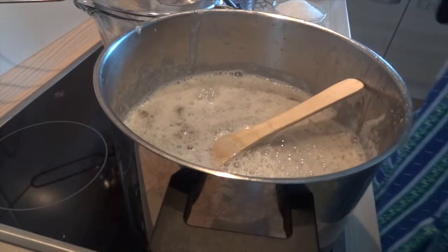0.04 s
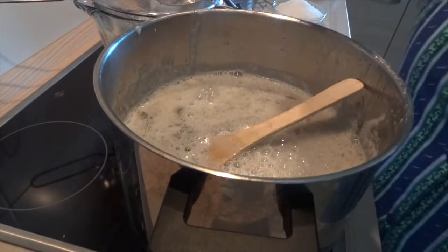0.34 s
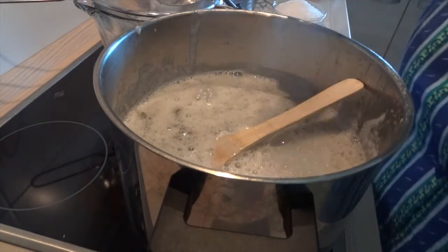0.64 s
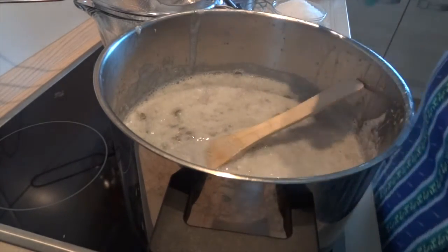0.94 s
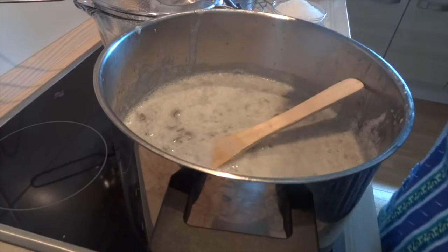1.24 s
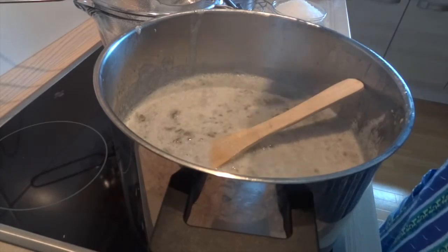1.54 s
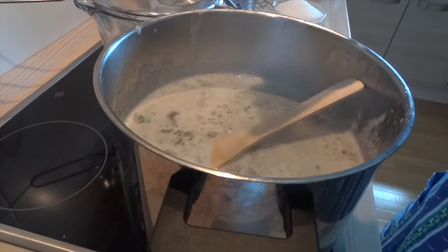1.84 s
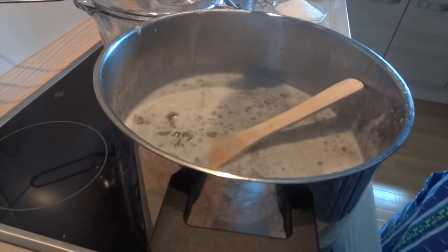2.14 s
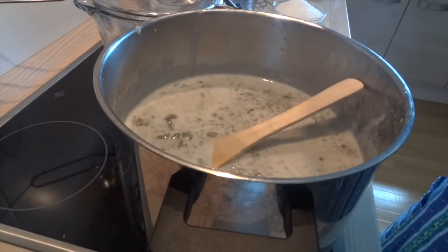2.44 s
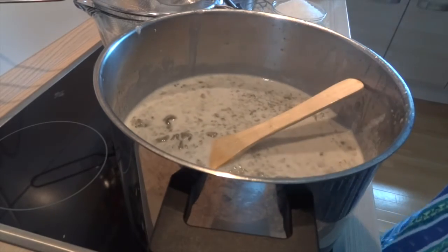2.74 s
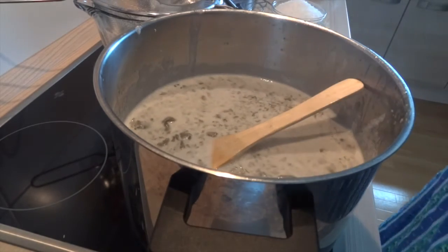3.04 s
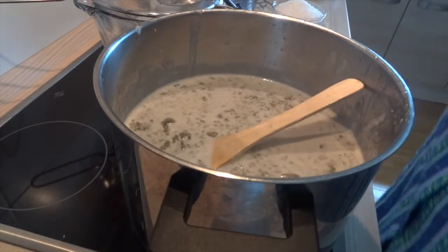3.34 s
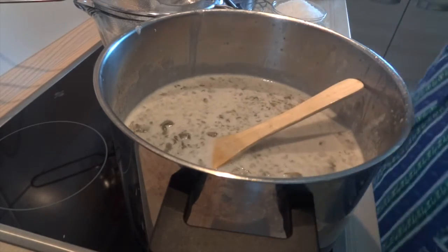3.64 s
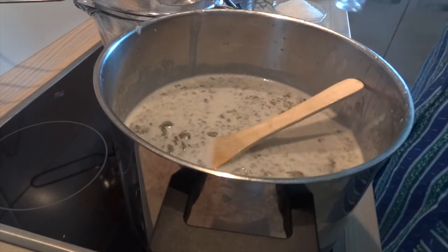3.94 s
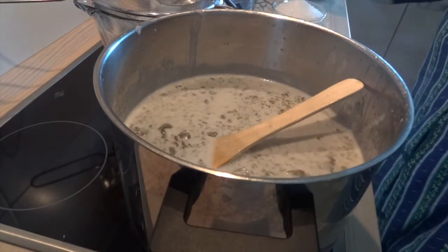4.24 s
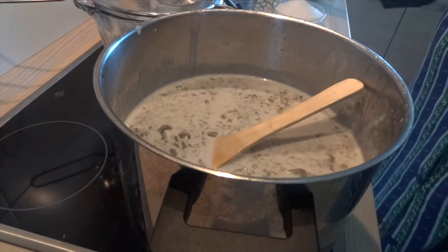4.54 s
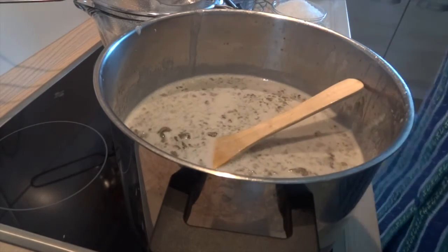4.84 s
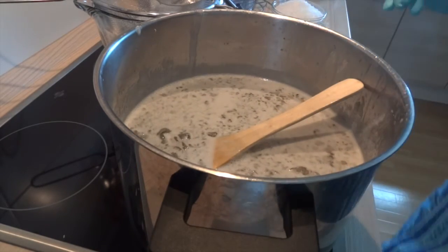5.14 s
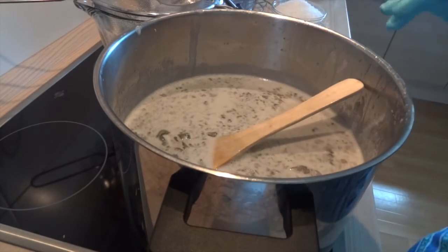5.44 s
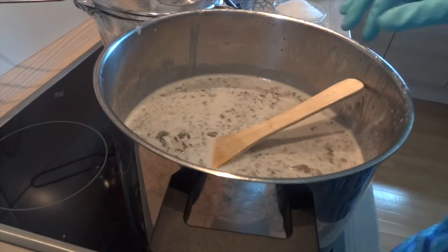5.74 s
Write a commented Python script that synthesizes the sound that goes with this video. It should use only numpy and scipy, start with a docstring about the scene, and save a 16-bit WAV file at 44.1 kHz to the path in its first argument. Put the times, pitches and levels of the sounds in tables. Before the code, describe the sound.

In a small, quiet kitchen, a nearby spray bottle is pumped five times in quick succession, with plastic snaps, spits of air and short hisses over a faint, fading fizz of foam. The bottle is set on the worktop with a few light, hollow taps. Clothes rustle softly, and a wooden door shuts with one sharp bang and a short boom, leaving low room hush.

```python
"""Five quick squirts from a trigger spray bottle hiss over softly fizzing foam in a small kitchen.
The plastic pump snaps, air pockets spit from the nozzle, mist hisses and the trigger clacks back.
The foam sits in a pot and fizzes because its tiny bubbles burst, more faintly as it collapses.
The bottle is put down, clothes rustle, and a wooden door bangs shut, so cupboard and room ring."""
import sys
import numpy as np
from scipy import signal
from scipy.fft import rfft, irfft, next_fast_len
from scipy.io import wavfile
from scipy.ndimage import uniform_filter1d

SR = 44100
rng = np.random.default_rng(int(sys.argv[2]) if len(sys.argv) > 2 else 0)


def wav_out(sig):
    """Save sig, one row per channel (or a flat mono array), as 16-bit PCM at SR to the path in sys.argv[1]."""
    wavfile.write(sys.argv[1], SR, np.round(np.clip(np.atleast_2d(sig).T, -1, 1) * 32767).astype(np.int16))


N = 264104
TIME = np.arange(N) / SR
RING = TIME[:SR]  # a one-second clock for short sounds

# A tone table says how strong each frequency is. A fade_s is the time to die away by 60 dB.
# tone of the room's hush: frequency_hz, level_db
HUSH_TONE = [(15, -25), (25, -25), (108, -1), (206, -5.5), (591, -8), (988, -13), (1130, -9), (1370, -12),
             (1790, -12), (3430, -15), (11900, -20.5), (14800, -21), (16000, -27)]
# how long the room echoes: frequency_hz, fade_s
ROOM_FADE = [(150, 0.45), (1000, 0.36), (4000, 0.33), (9000, 0.38), (16000, 0.1)]
# tone of the room's echo: frequency_hz, level_db
ROOM_ECHO_TONE = [(200, 7.5), (1200, 4), (3000, -1.5), (5000, -1), (16000, -1.5)]
# echoes off the pot and worktop: delay_s, gain
CLOSE_ECHOES = [(.003, 0.24), (.0058, 0.13), (.0069, 0.14)]
# how much hush and echo differ between left and right: frequency_hz, level_db
STEREO_WIDTH = [(60, -12), (110, -11.5), (200, 0), (400, 4.5), (1300, 2.5), (2400, -2.5), (4400, -13),
                (8000, -44.5), (16000, -42)]
# how far the left side is ahead of the right: frequency_hz, phase_radians
LEFT_LEAD = [(40, 0), (120, .15), (400, 0.32), (750, 0.6), (1200, 0.3), (2400, 0.3), (4400, 0), (16000, 0)]
# tone of bursting bubbles: frequency_hz, level_db
FIZZ_TONE = [(300, 2), (1000, -2.5), (2100, 2), (5000, -0.5), (10000, -4), (16000, -5.5)]
# clothes and gloves rubbing: start_s, length_s, level_db, centre_hz
CLOTH_RUSTLES = [(.15, .32, -50, 2060), (2.642, 0.12, -51.5, 4670), (3.689, 0.16, -50.5, 3100),
                 (3.94, .12, -49, 4460), (4.143, 0.061, -49.5, 4000), (4.819, 0.075, -55.5, 2520),
                 (5.194, 0.07, -49.5, 2920), (5.66, 0.34, -58.5, 655), (5.933, .08, -51, 1600)]
# small handling ticks and the door latch's click: start_s, level_db, centre_hz, width_octaves, decay_s
SMALL_TICKS = [(.066, -39, 2700, .25, 0.0091), (0.51, -30.5, 3880, 0.72, .008),
               (2.5636, -28.5, 4940, 1.35, 0.0025), (2.6005, -37, 3970, 0.094, 0.0024),
               (2.6675, -29, 4760, 0.24, 0.0044), (2.839, -43.5, 2850, 0.12, 0.0016),
               (2.8534, -39, 5900, 0.31, 0.0015), (2.896, -38.5, 7000, 0.46, .0034),
               (2.938, -42, 4150, 0.51, .012), (3.769, -42, 2530, 0.32, 0.0032),
               (4.1366, -39, 1570, 1, 0.022), (4.513, -38, 6460, .4, 0.0028),
               (5.548, -44.5, 6000, 1.6, 0.0064)]
# thin, lingering rings: start_s, level_db, pitch_hz, decay_s
THIN_PINGS = [(2.014, -37, 1200, 0.043), (5.799, -46, 14300, .025)]
# the bottle rocking on the worktop: start_s, level_db, centre_hz, width_octaves, decay_s, ring_db
BOTTLE_TAPS = [(3.0282, -33.5, 2600, 0.56, .003, -7), (3.164, -38, 2050, 1.1, 0.003, -13),
               (3.3113, -23, 2480, 0.62, 0.01, -13), (3.3453, -20, 1850, 0.45, 0.0014, -14),
               (3.38, -31, 2930, 0.54, .0086, -20), (3.484, -31, 1540, 0.43, 0.005, -18)]
# notes the bottle rings with: pitch_hz, level_db, fade_s
BOTTLE_NOTES = [(1810, -2, 0.1), (2850, -2, .22), (2980, 6, 0.17), (5500, -7, 0.3), (5680, -1, 0.17)]
# tone of the hollow cupboard: frequency_hz, level_db
CUPBOARD_TONE = [(35, -71), (60, -14.5), (156, -6), (198, -9.5), (233, -25), (268, -8), (398, -6.5),
                 (480, -14), (527, -16), (991, -9.5), (1250, -11.5), (5330, -20), (16000, -43.5)]
# how long the cupboard booms: frequency_hz, fade_s
CUPBOARD_FADE = [(100, 0.69), (400, 0.5), (1500, 0.51), (5000, 0.44), (14000, 0.56)]
# the door rattling against its frame: start_s, level_db, centre_hz, width_octaves
DOOR_BLOWS = [(4.349, -16.5, 1920, 1.1), (4.356, -20.5, 785, 0.97), (4.369, -24, 1500, 1.2),
              (4.3796, -19, 580, 0.21), (4.413, -25, 1180, 0.19)]
# notes the cupboard and room ring with after the bang: pitch_hz, level_db, fade_s
CUPBOARD_ROOM_NOTES = [(79.7, -9, 0.42), (153.6, 3.5, 0.27), (237.5, -1, 0.35), (392.5, -6.5, 0.49),
                       (401.4, 4.5, 0.32), (434.5, 0, 0.32), (456, -6, 0.31), (516, -3, 0.44),
                       (546, 0.5, 0.37), (570, -14, 0.56), (616, -6.5, 0.37), (617, 1.5, 0.35),
                       (683, -9, 0.44), (716, -8, 0.33), (764, -6, 0.35), (810, -4, 0.33), (808, -5, 0.33),
                       (840, -7.5, 0.39), (925, -8, 0.34), (1040, -16, 0.39), (1180, -7.5, 0.44),
                       (1268, -8.5, 0.44), (1291, -7, 0.38), (1435, -11.5, 0.42), (1590, -4, 0.2),
                       (1875, -22, 0.39), (1860, -15, 0.45), (2005, -13, 0.3), (2105, -10, 0.37)]
# the pump sipping fresh liquid: start_s, level_db
PUMP_SIPS = [(0.939, -28.5), (2.013, -27), (2.376, -29)]
# sharp snaps of the plastic pump: start_s, level_db, decay_s
PUMP_SNAPS = [(1.1491, -32, 0.0044), (1.4743, -20.5, 0.0043), (1.5309, -16.5, 0.008), (1.8086, -16, 0.0057)]
# tone of a snap: frequency_hz, level_db
SNAP_TONE = [(240, -66), (400, -24.5), (1490, -9), (1840, -13), (2290, -6), (2590, -7), (3260, 0),
             (4110, -11.5), (5190, -6), (7990, -8), (15000, -19), (16000, -15.5)]
# the trigger springing back to its stop: start_s, level_db, decay_s
TRIGGER_CLACKS = [(0.9304, -20, 0.0038), (1.4186, -22, .0015), (1.718, -21, 0.0025), (1.997, -21.5, 0.0046),
                  (2.346, -18.5, 0.0052)]
# tone of a clack: frequency_hz, level_db
CLACK_TONE = [(180, -34), (300, -14.5), (1260, 4), (1540, 5.5), (2070, -10.5), (2990, 7), (3280, 3),
              (3890, -14), (5130, -15), (6180, -31), (7320, -14), (7910, -32), (9230, -26), (11100, -33),
              (12000, -32), (15600, -62), (22000, -120)]
# the mist from each pull of the trigger: start_s, level_db
SQUIRTS = [(0.67, -37), (1.207, -32), (1.551, -31), (1.823, -31.5), (2.171, -31)]
# tone of the mist: frequency_hz, level_db
MIST_TONE = [(150, -65), (250, -15.5), (452, -37.5), (723, -12), (1020, -12.5), (1420, -5), (1640, -9.5),
             (1950, -4), (2440, -4), (2910, 1), (5440, -2), (13400, 0.5), (16000, -6.5)]
# air pockets bursting from the nozzle: start_s, level_db, decay_s
AIR_SPITS = [(0.671, -19.5, 0.0049), (0.717, -29, 0.005), (0.7318, -19.5, 0.0062), (.749, -23.5, .008),
             (.7725, -26, 0.0021), (0.7965, -21.5, 0.0098), (0.8414, -33, 0.0018), (1.1997, -28, 0.0037),
             (1.2104, -26.5, .0015), (1.563, -26, .005), (1.8476, -25.5, 0.0026), (1.864, -20, 0.0066),
             (2.1781, -24.5, .005)]
# tone of a spit: frequency_hz, level_db
SPIT_TONE = [(100, -16), (400, -3.5), (900, 0), (2000, -3.5), (5000, -5), (9000, 1), (12000, 7),
             (14500, 7.5), (16000, -12)]
DOOR_SHUT_S = DOOR_BLOWS[0][0]


def amp(db):
    """Turns decibels into a gain to multiply by."""
    return 10 ** (np.asarray(db) / 20)


def unit(x):
    """Scales a sound to an average (rms) level of 1."""
    return x / np.sqrt(np.mean(x ** 2) + 1e-20)


def packet(x):
    """Gives a short sound the energy of 5 ms at level 1."""
    return x * np.sqrt(.005 * SR / (np.sum(x ** 2) + 1e-20))


def read(points, hz):
    """Looks up a frequency in a table, gliding between rows on a log scale."""
    f, value = np.transpose(points)
    return np.interp(np.log(hz + 1), np.log(f + 1), value)


def add(mix, s, sound):
    """Mixes a sound in, starting at s seconds."""
    part = mix[round(s * SR):][:len(sound)]
    part += sound[:len(part)]


def colour(x, tone, size=4096):
    """Filters a sound to follow a tone table."""
    log_gain = np.log(amp(read(tone, abs(np.fft.fftfreq(size, 1 / SR)))))
    response = np.exp(np.conj(signal.hilbert(log_gain)))  # rings after a hit, never before
    taps = np.fft.ifft(response).real[:size // 2]
    return signal.oaconvolve(x, taps)[:len(x)]


def hump(hz, octaves):
    """A tone table with one peak at hz."""
    f = np.geomspace(30, SR / 2, 400)
    return np.transpose([f, -20 * np.log10(1 + (np.log2(f / hz) / octaves) ** 2 / 2) * 1.185])


def contact(decay_s, crack):
    """Two things touch: a sharp crack, then dying chatter."""
    chatter = packet(rng.standard_normal(SR) * np.exp(-np.minimum(RING / decay_s, 20)))
    return chatter + crack * packet(1. * (RING == 0))


def click(db, tone, decay_s, crack):
    """One contact, with the tone of the thing it strikes."""
    return amp(db) * packet(colour(contact(decay_s, crack), tone))


def grains(per_s, spread_db, size):
    """Random clicks, most small and a few large."""
    clicks = (rng.random(size) < per_s / SR) * rng.standard_normal(size)
    return clicks * amp(spread_db * np.minimum(rng.exponential(1, size), 4))


def tail(fades, size=256):
    """One second of noise in which each frequency dies at its own speed."""
    hz, t, bands = signal.stft(rng.standard_normal(SR), SR, nperseg=size)
    fading = amp(-60 * t / read(fades, hz)[:, None])
    return signal.istft(bands * fading, SR, nperseg=size)[1][:SR]


def ring(notes):
    """Several fading notes ringing at once."""
    return packet(sum(amp(db - 60 * RING / fade_s) * np.sin(2 * np.pi * (hz * RING + rng.random()))
                      for hz, db, fade_s in notes))


def background(hush_db=-56.5, rumble_db=-66.5, late_rumble_db=-54, sink_db_per_s=9.5):
    """The room's hush and a low rumble, which is louder after the door shuts, then fades."""
    hush = amp(hush_db) * unit(colour(rng.standard_normal(N), HUSH_TONE))
    since_shut = np.maximum(TIME - DOOR_SHUT_S, 0)
    late_level = (TIME > DOOR_SHUT_S) * amp(late_rumble_db - sink_db_per_s * since_shut)
    rumble = unit(colour(rng.standard_normal(N), hump(hz=95, octaves=0.45)))
    return hush + np.hypot(amp(rumble_db), late_level) * rumble


def kitchen(x, early_db=-9, early_s=0.0037, late_db=-9, build_s=0.0022, echoes=3):
    """Sound bounces off utensils, then round the room; three echoes take turns to keep the hiss smooth."""
    out = np.zeros(N)
    for k in range(echoes):
        early = rng.standard_normal(SR) * RING * np.exp(-np.minimum(2 * RING / early_s, 40))
        late = colour(tail(ROOM_FADE), ROOM_ECHO_TONE) * (1 - np.exp(-RING / build_s))
        echo = amp(early_db) * early / np.linalg.norm(early) + amp(late_db) * late / np.linalg.norm(late)
        share = np.sqrt(2 / echoes) * np.cos(np.pi * (4 * TIME + k / echoes))
        out += signal.oaconvolve(x * share, echo)[:N]
    return out


def nearby(x):
    """A sound plus its quick echoes off the pot and worktop."""
    out = x.copy()
    reflected = colour(x, hump(hz=1500, octaves=0.76))
    for delay_s, gain in CLOSE_ECHOES:
        add(out, delay_s, gain * reflected)
    return out


def foam(start_db=-54, sink_db_per_s=7, wetted_db=-57.5, wetted_s=0.15):
    """Tiny bubbles burst: the fizz fades as the foam collapses and swells when mist lands on it."""
    wetted = signal.lfilter([1], [1, -np.exp(-1 / (wetted_s * SR))], flow())
    level = np.hypot(amp(start_db - sink_db_per_s * TIME), amp(wetted_db) * unit(wetted))
    pops = grains(per_s=5000, spread_db=1.0, size=N)
    return level * unit(colour(pops, FIZZ_TONE))


def clothes(catches=4, catch_db=1, scatter_octaves=1.9):
    """Fibres slip in a swell of tiny clicks, and now and then catch with a small pitched tick."""
    out = np.zeros(N)
    for s, length_s, db, hz in CLOTH_RUSTLES:
        swell = np.sin(np.pi * np.minimum(RING / length_s, 1))
        slips = grains(per_s=2600, spread_db=2.5, size=SR)
        add(out, s, amp(db) * swell * unit(colour(slips, hump(hz, octaves=1.0))))
        for k, (when, pitch) in enumerate(rng.random((catches, 2))):
            tone = hump(hz * 2 ** (scatter_octaves * (pitch - .5)), octaves=0.22)
            tick = click(db + catch_db, tone, decay_s=0.0083, crack=0)
            add(out, s + length_s * (k + when) / catches, tick)
    return out


def ticks(crack_s=0.0014, brush_db=-16, brush_lead_s=.011):
    """Handling ticks and the door latch: a soft brush, then a click; brief ones crack the most."""
    out = np.zeros(N)
    for s, db, hz, octaves, decay_s in SMALL_TICKS:
        tone = hump(hz, octaves)
        add(out, s - brush_lead_s, click(db + brush_db, tone, decay_s=0.014, crack=0))
        add(out, s, click(db, tone, decay_s, crack_s / decay_s))
    return out


def pings(width_hz=110):
    """Faint, thin rings: fading noise squeezed around one pitch."""
    out = np.zeros(N)
    for s, db, hz, decay_s in THIN_PINGS:
        add(out, s, click(db, hump(hz, np.log2(1 + width_hz / hz)), decay_s, crack=0))
    return out


def bottle_set_down(crack_s=0.0016, worktop_db=-18, hollow_db=-22, hollow_lag_s=0.0062):
    """The bottle rocks on the worktop, which knocks dully; the firmest tap sounds its hollow body."""
    out = np.zeros(N)
    for s, db, hz, octaves, decay_s, ring_db in BOTTLE_TAPS:
        crack = crack_s / decay_s
        add(out, s, click(db, hump(hz, octaves), decay_s, crack))
        add(out, s, amp(db + ring_db) * ring(BOTTLE_NOTES))
        add(out, s, click(db + worktop_db, hump(hz=830, octaves=0.26), decay_s, crack))
    firmest_s = max(BOTTLE_TAPS, key=lambda tap: tap[1])[0]
    hollow = click(hollow_db, hump(hz=1915, octaves=.13), decay_s=0.021, crack=0)
    add(out, firmest_s + hollow_lag_s, hollow)
    return out


def cupboard(db=-13):
    """The hollow cupboard and the room boom on after the door shuts."""
    out = np.zeros(N)
    add(out, DOOR_SHUT_S, amp(db) * packet(colour(tail(CUPBOARD_FADE), CUPBOARD_TONE)))
    return out


def door(ring_db=-8, rise_s=0.012):
    """The first blow sets the cupboard and room ringing; the door then rattles shut."""
    out = np.zeros(N)
    ringing = ring(CUPBOARD_ROOM_NOTES) * (1 - np.exp(-RING / rise_s))
    add(out, DOOR_SHUT_S, amp(ring_db) * packet(ringing))
    for s, db, hz, octaves in DOOR_BLOWS:
        add(out, s, click(db, hump(hz, octaves), decay_s=0.0094, crack=0.31))
    return out


def squeak(start_s=.632, length_s=0.046, hz=1930, wobble=0.048, db=-50):
    """The pump's seal squeaks faintly as the first pull builds pressure."""
    t = RING[RING < length_s]
    pitch = hz * (1 + wobble * unit(uniform_filter1d(rng.standard_normal(len(t)), size=25)))
    swell = amp(db) * (.3 + t / length_s) * signal.windows.tukey(len(t), .2)
    out = np.zeros(N)
    add(out, start_s, swell * unit(np.sin(2 * np.pi * np.cumsum(pitch) / SR)))
    return out


def suction(puff_db=-30):
    """The first pull puffs the air out of the pump; later it refills in short sips."""
    out = np.zeros(N)
    add(out, AIR_SPITS[0][0], click(puff_db, hump(hz=650, octaves=1.0), decay_s=.006, crack=0.1))
    for s, db in PUMP_SIPS:
        add(out, s, click(db, hump(hz=5100, octaves=1.3), decay_s=0.0071, crack=0.1))
    return out


def trigger(valve_lead_s=0.0098, valve_db=-9.0, clack_crack=1.43):
    """The pump snaps when pressed; on release its valve clicks just before the trigger hits its stop."""
    out = np.zeros(N)
    for s, db, decay_s in PUMP_SNAPS:
        add(out, s, click(db, SNAP_TONE, decay_s, crack=0.57))
    for s, db, decay_s in TRIGGER_CLACKS:
        add(out, s - valve_lead_s, click(db + valve_db, CLACK_TONE, decay_s, clack_crack))
        add(out, s, click(db, CLACK_TONE, decay_s, clack_crack))
    return out


def flow(start_db=-7, swell_share=0.29, push_s=0.12, spent_db=-9):
    """How strongly mist flows: it swells under the finger, holds, and sinks as the trigger returns."""
    out = np.zeros(N)
    for (s, db), (back_s, _, _) in zip(SQUIRTS, TRIGGER_CLACKS):
        opening = np.maximum(1 - RING / (swell_share * (back_s - s)), 0)
        closing = np.maximum(RING - push_s, 0) / max(back_s - s - push_s, .01)
        add(out, s, amp(db + start_db * opening + spent_db * closing ** 1.35))
    return out


def nozzle(rise_s=0.00072, sputter_db=-8, sputter_s=0.014):
    """Mist hisses with the flow; each air pocket spits and trails a sputter of droplets."""
    spits = np.zeros(N)
    for s, db, decay_s in AIR_SPITS:
        burst = packet(contact(decay_s, crack=0) * (1 - np.exp(-RING / rise_s)))
        droplets = grains(per_s=3000, spread_db=0.5, size=SR)
        sputter = packet(droplets * RING * np.exp(-2 * RING / sputter_s))
        add(spits, s, amp(db) * packet(colour(burst + amp(sputter_db) * sputter, SPIT_TONE)))
    mist = flow() * unit(colour(rng.standard_normal(N), MIST_TONE))
    return mist + spits


def scene(close_db=-0.73, pump_echo_db=-3, left_db=0.23, right_db=0.55,
          room_side_db=-7, hush_side_db=-4, off_centre_db=-17):
    """Mixes it all in stereo: mid is what both ears share, side is how they differ."""
    spray = nearby(nozzle())
    pump = nearby(trigger() + squeak())
    handling = nearby(suction() + ticks() + pings() + bottle_set_down() + clothes())
    close = amp(close_db) * (spray + pump + handling)
    into_room = amp(close_db) * (spray + amp(pump_echo_db) * pump + handling)
    mid = close + kitchen(into_room) + door() + cupboard() + foam() + background()
    # fresh echo and hush for the side make the room sound wide
    room_side = amp(room_side_db) * (kitchen(into_room) + cupboard())
    side = colour(room_side + amp(hush_side_db) * background(), STEREO_WIDTH)
    # the bottle is held off-centre, so its clicks reach the two sides a tiny moment apart
    side += amp(off_centre_db) * np.gradient(pump + handling)
    # the left side hears the whole scene slightly earlier
    size = next_fast_len(N + SR // 10)
    turn = np.tan(read(LEFT_LEAD, np.fft.rfftfreq(size, 1 / SR)) / 2)
    side += irfft(1j * turn * rfft(mid, size), size)[:N]
    return np.array([amp(left_db) * (mid + side), amp(right_db) * (mid - side)])


def record(dry, cutoff_hz=16050):
    """Cuts away the very highest treble."""
    lowpass = signal.firwin(401, cutoff_hz, window=("kaiser", 8), fs=SR)
    return signal.oaconvolve(dry, lowpass[None], "same", axes=1)


dry = scene()
out = record(dry)
wav_out(out)
```